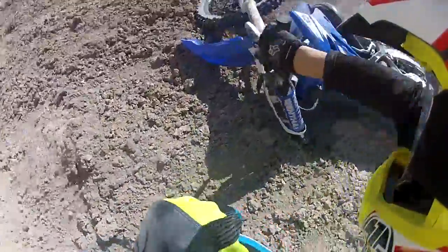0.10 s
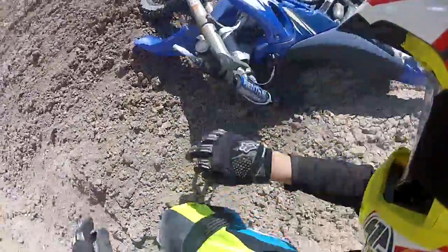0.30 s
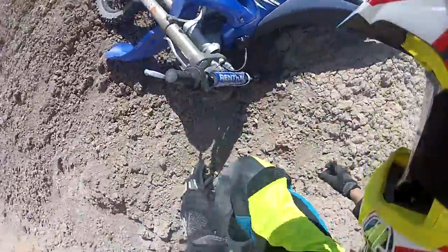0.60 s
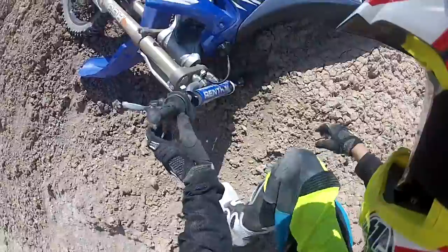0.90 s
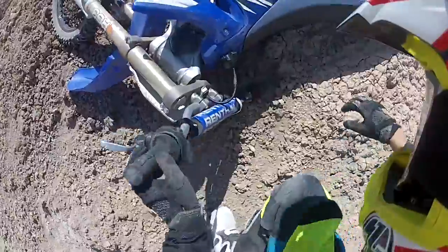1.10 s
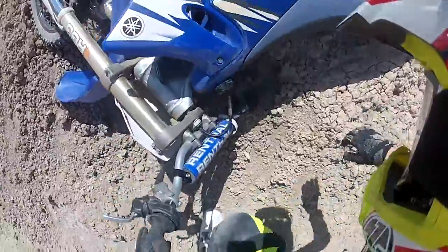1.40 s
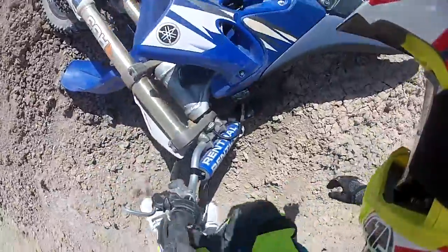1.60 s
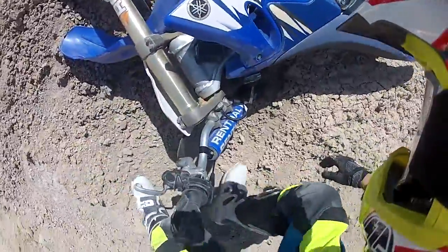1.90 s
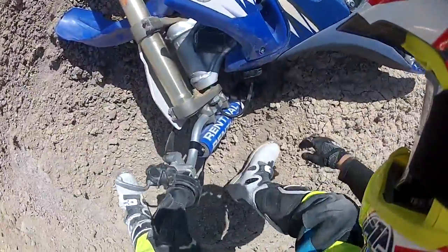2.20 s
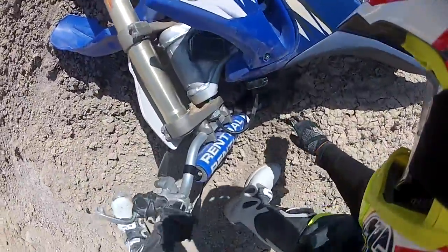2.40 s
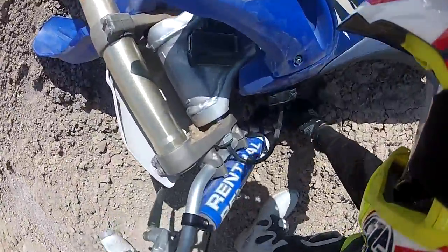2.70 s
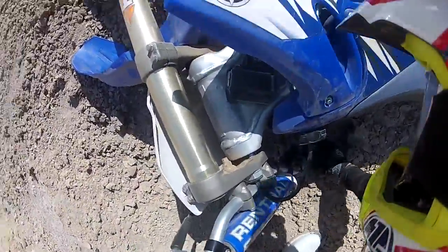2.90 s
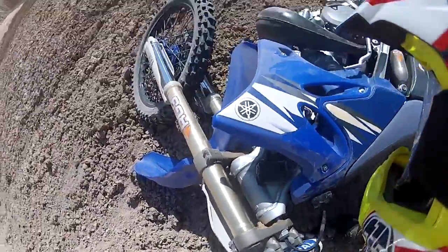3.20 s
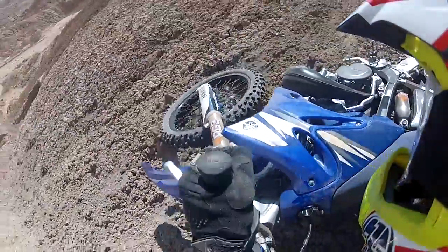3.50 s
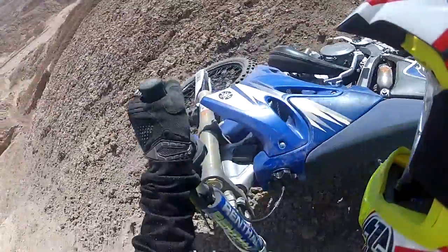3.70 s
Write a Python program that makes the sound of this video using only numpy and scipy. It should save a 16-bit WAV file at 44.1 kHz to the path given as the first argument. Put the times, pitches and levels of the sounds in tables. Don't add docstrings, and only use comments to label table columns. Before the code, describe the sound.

Scuffing boots slide over gritty ground while a muffled microphone rumbles, straps tap and pebbles tick

```python
import sys
import numpy as np
from scipy import signal
from scipy.fft import rfft, irfft, next_fast_len
from scipy.io import wavfile
from scipy.ndimage import uniform_filter1d, map_coordinates

SR = 44100
rng = np.random.default_rng(int(sys.argv[2]) if len(sys.argv) > 2 else 0)


def makeup_ratio(level_db):
    decades = np.asarray(level_db, float) / 20
    return 10 ** decades


def master(y):
    cut = np.clip(np.atleast_2d(y).T, -1, 1)
    pcm = np.round(cut * 32767)
    wavfile.write(sys.argv[1], SR, pcm.astype(np.int16))


N = 167580

PATCH_DB = 2


def unit(x):
    return x / np.sqrt(np.mean(x ** 2) + 1e-20)


def filtered(x, response):
    m = next_fast_len(N + 8192)
    return irfft(rfft(x, m) * response(np.fft.rfftfreq(m, 1 / SR)), m)[:N]


def coloured(x, points):
    f, db = np.transpose(points)
    f = np.r_[f[0] / 2, f, f[-1] * 2]
    db = np.r_[-90, db, -90]
    return unit(filtered(x, lambda hz: makeup_ratio(np.interp(np.log(hz + 1), np.log(f + 1), db))))


def curve(rows):
    s, *cols = np.transpose(rows)
    return [np.interp(np.arange(N) / SR, s, c) for c in cols]


def wobble(rate):
    knots = rng.standard_normal(int(N / SR * 400) + 4)
    return map_coordinates(knots, [np.arange(N) * rate / SR])


def gate(s, length, attack, release):
    t = np.arange(N) / SR - s
    return np.clip(t / attack, 0, 1) * np.exp(-np.maximum(t - length, 0) / release)


def grains(count, spread_db):
    place, sign, strength = rng.random((count, 3)).T
    out = np.zeros(N)
    out[(place * N).astype(int)] = np.sign(sign - 0.5) * makeup_ratio(-spread_db * np.log(strength + 0.003))
    return out


def patchy(depth_db):
    z = signal.stft(rng.standard_normal(N), nperseg=256)[2]
    field = uniform_filter1d(rng.standard_normal(z.shape), size=4, axis=0)
    field = uniform_filter1d(field, size=10, axis=1)
    return signal.istft(z * makeup_ratio(depth_db * unit(field)), nperseg=256)[1][:N]


def add(out, s, x):
    part = out[round(s * SR):][:len(x)]
    part += x[:len(part)]


def rumble():
    # start_s, length_s, first_level_db, last_level_db
    gusts = [(0.501, 0.12, -37.5, -20), (0.668, 0.053, -21.5, -34), (0.746, .13, -19.5, -26),
             (0.879, 0.17, -25.5, -27.5), (1.082, 0.054, -34, -39), (1.349, 0.11, -38, -48),
             (1.416, 0.09, -51, -46.5), (1.511, 0.2, -31, -41.5), (1.726, 0.2, -33.5, -36),
             (1.875, 0.15, -33.5, -33), (2.017, 0.099, -36.5, -32.5), (2.149, 0.054, -30.5, -38),
             (2.222, 0.01, -43, -29.5), (2.339, .18, -31.5, -33.5), (2.544, 0.065, -25.5, -37),
             (2.765, 0.19, -35, -39.5), (2.936, 0.15, -60, -51), (3.082, 0.08, -30.5, -39),
             (3.168, 0.086, -22.5, -36), (3.259, 0.057, -47, -35.5), (3.333, 0.13, -44, -45)]
    # frequency_hz, level_db
    push_colour = [(13, -38), (22, 13), (43, 6.5), (103, 2.5), (208, -8.5), (243, -12.5), (400, -27),
                   (520, -27), (880, -120)]
    lump_db, even, even_s, skew = 1.5, 0.83, 0.035, 0.08
    t = np.arange(N) / SR
    strength = makeup_ratio(-51)
    for s, length, first_db, last_db in gusts:
        level = makeup_ratio(np.interp(t, [s, s + length], [first_db, last_db]))
        strength = strength + level * gate(s, length, attack=0.014, release=0.015)
    push = coloured(makeup_ratio(lump_db * wobble(29.93)) * rng.standard_normal(N), push_colour)
    width = int(even_s * SR)
    swell = np.abs(uniform_filter1d(uniform_filter1d(push ** 2, width), width))
    push = unit(push / (swell + 0.059) ** (even / 2))
    lopsided = push + skew * filtered(push ** 2, lambda hz: hz > 25)
    return strength * unit(lopsided)


def taps():
    # start_s, peak_db, pitch_hz
    knocks = [(0.008, -32, 520), (0.153, -26.5, 385), (0.206, -21.5, 500), (0.273, -26, 510),
              (0.281, -38, 547), (0.307, -35, 600), (0.353, -29, 466), (0.437, -23, 440),
              (0.45, -31.5, 262), (0.476, -26.5, 540), (0.77, -27.5, 298), (0.803, -27, 513),
              (0.848, -32, 355), (0.935, -27.5, 517), (0.981, -48, 560), (1.014, -39, 514),
              (1.03, -32.5, 298), (1.059, -43, 560), (1.093, -31, 480), (1.42, -39, 296),
              (1.44, -35.5, 292), (1.503, -33.5, 440), (1.621, -21, 530), (1.633, -28.5, 550),
              (1.992, -35.5, 556), (2.314, -33, 490), (2.351, -36, 452), (2.38, -32, 470),
              (2.593, -33, 556), (2.932, -34, 600), (2.962, -30, 325), (2.982, -27, 280),
              (2.99, -26.5, 297), (2.999, -30, 453), (3.003, -33, 563), (3.424, -34, 510),
              (3.536, -29, 204), (3.609, -32, 603), (3.654, -33.5, 585), (3.715, -36, 285),
              (3.751, -36.5, 580)]
    # delay_s, level_db
    rattle = [(.007, -16.5), (.012, -23.5), (.02, -43)]
    swell_s, cycles = 0.00327, 0.78
    out, t = np.zeros(N), np.arange(-500, 500) / SR
    for s, db, hz in knocks:
        blip = np.cos(2 * np.pi * hz * t) * np.exp(-(t * hz / cycles) ** 2)
        for delay, echo_db in [(0.00073, 0)] + rattle:
            add(out, s + swell_s + delay + t[0], makeup_ratio(db + echo_db) * blip)
    return out


def squeaks():
    # time_s, pitch_hz, level_db
    whistles = [
        [(3.412, 1850, -58), (3.428, 2350, -57), (3.44, 2750, -60), (3.455, 3300, -56), (3.467, 3900, -70)],
        [(3.585, 2830, -66), (3.606, 2900, -68), (3.611, 2930, -55), (3.622, 3000, -51), (3.648, 3150, -58),
         (3.666, 3260, -63), (3.678, 3350, -55), (3.692, 3460, -53), (3.698, 3510, -68)],
        [(3.7, 3540, -67), (3.72, 3600, -67), (3.735, 3700, -71), (3.75, 3830, -68), (3.76, 3910, -63),
         (3.778, 4050, -74)],
    ]
    waver, flutter_db = 0.008, 2.2
    out, t = np.zeros(N), np.arange(N) / SR
    for rows in whistles:
        hz, db = curve(rows)
        phase = 2 * np.pi * np.cumsum(hz * (1 + waver * wobble(120))) / SR
        sounding = (t > rows[0][0]) * (t < rows[-1][0])
        out += sounding * makeup_ratio(db + 2.5 + flutter_db * wobble(70)) * np.sin(phase)
    return out


def ticks():
    # start_s, peak_db, pitch_hz
    pebbles = [(0.2271, -37, 1350), (0.2322, -30, 3100), (0.239, -44, 3500), (0.395, -51, 1600),
               (0.4772, -39.5, 1630), (0.55, -46, 2440), (0.5702, -44, 2240), (0.581, -44.5, 2640),
               (0.6308, -43.5, 1390), (0.7917, -47, 2500), (0.807, -47, 2310), (0.8431, -51, 2500),
               (0.8708, -44, 2800), (0.8847, -48, 2800), (0.9124, -46, 2020), (1.0194, -50, 1830),
               (1.608, -55, 2100), (1.622, -44, 2250), (1.629, -42, 2950), (1.642, -45, 3050),
               (1.8652, -40, 3740), (1.889, -48.5, 2070), (2.0712, -46.5, 3160), (3.197, -41.5, 1820),
               (3.238, -40.5, 2900), (3.327, -42, 1800), (3.3544, -44, 3030), (3.3784, -44, 2580),
               (3.392, -36.5, 1880), (3.399, -52, 4200), (3.452, -44, 1300), (3.4252, -37.5, 1380),
               (3.478, -47, 2200), (3.505, -40, 3230), (3.5188, -39, 3130), (3.536, -43, 900),
               (3.6358, -32, 1860), (3.656, -40, 1850), (3.6635, -36, 2600), (3.6706, -38.5, 2600),
               (3.694, -47, 1800), (3.704, -46, 2270), (3.789, -43, 1700)]
    # start_s, peak_db, pitch_hz
    fine_pebbles = [(0.2309, -33.5, 5600), (3.1844, -40, 4000), (3.194, -43, 4000), (3.206, -40, 3950),
                    (3.2178, -46, 4830), (3.2388, -42, 4900), (3.2716, -37, 5400), (3.321, -43, 4900),
                    (3.343, -53, 4000), (3.3543, -44, 5440), (3.3803, -42, 5450), (3.392, -43, 5500),
                    (3.6352, -35, 3870), (3.658, -46, 5300), (3.665, -42, 5600), (3.671, -44, 5400)]
    contact = 4
    cracks, rings, t = np.zeros(N), np.zeros(N), np.arange(900) / SR
    for rows, t60, ring in [(pebbles, 0.0085, 1), (fine_pebbles, 0.005, 0.45)]:
        for s, db, hz in rows:
            fade = makeup_ratio(db - 60 * t / t60)
            add(cracks, s, fade * (rng.standard_normal(len(t)) + contact * (t == 0)))
            add(rings, s, ring * fade * np.sin(2 * np.pi * hz * t))
    return rings + filtered(cracks, lambda hz: hz ** 2 / (hz ** 2 + 1300 ** 2))


def rasp():
    # start_s, length_s, level_db
    strokes = [
        (3.338, 0.027, -70),
        (3.4, 0.074, -62),
        (3.475, 0.057, -64),
        (3.546, 0.054, -68.5),
    ]
    centre_hz, width_hz = 3950, 200
    band = filtered(grains(count=2500, spread_db=0), lambda hz: np.exp(-((hz - centre_hz) / width_hz) ** 2))
    return unit(band) * sum(makeup_ratio(db) * gate(s, length, 0.01, 0.012) for s, length, db in strokes)


def scrapes():
    # start_s, length_s, bright_db, dull_db, sharp_edge_db
    slips = [(0.223, 0.02, -44, -41, -48.5), (0.243, 0.019, -80, -41, -83), (0.487, 0.011, -52.5, -42, -80),
             (0.922, 0.028, -53, -38, -89), (1.267, 0.049, -60.5, -81, -62),
             (1.606, 0.02, -53.5, -45.5, -63), (1.619, 0.03, -52.5, -35.5, -64),
             (1.652, 0.036, -65, -50, -66), (1.864, 0.0049, -49, -40, -59), (1.99, 0.03, -64, -56, -61.5),
             (1.789, 0.023, -66, -72, -68), (2.273, 0.13, -58.5, -45, -64.5),
             (2.907, 0.077, -58, -43.5, -61), (2.961, 0.057, -61, -39, -70), (3.01, 0.1, -67, -43.5, -89),
             (3.333, 0.1, -51.5, -59, -60.5), (3.401, 0.072, -59, -43, -67),
             (3.486, 0.075, -59, -52, -62.5), (3.613, 0.046, -53, -46.5, -61), (3.79, .02, -56, -58, -61)]
    # frequency_hz, level_db
    bright_colour = [(700, 5.5), (1200, 8.5), (2200, 4), (3100, 4), (3800, -20), (4500, -55)]
    # frequency_hz, level_db
    case_colour = [(150, -0.5), (280, -2.5), (520, -1.5), (700, -11), (950, -19), (1500, -35)]
    # frequency_hz, level_db
    sharp_colour = [(3200, 5), (3900, -2), (5000, 0.5), (5900, 8.5)]
    # centre_hz, width_hz, boost_db
    hollows = [(1330, 150, 6), (2250, 590, 8), (3050, 360, 4.5)]
    sag_db = 2
    t, shapes = np.arange(N) / SR, np.zeros((3, N))
    for s, length, *layers_db in slips:
        sag = makeup_ratio(-sag_db * np.clip((t - s) / length, 0, 1))
        slow = 5 * length ** 2
        opening = gate(s, length, attack=0.00074 + slow, release=0.0015 + slow)
        shapes += makeup_ratio(layers_db)[:, None] * sag * opening
    gritty = unit(patchy(PATCH_DB)) + 1.34 * unit(grains(count=4000, spread_db=2.5))
    hollow = filtered(gritty, lambda hz: makeup_ratio(sum(db * np.exp(-((hz - c) / w) ** 2) for c, w, db in hollows)))
    bright = coloured(hollow, bright_colour)
    dull = coloured(rng.standard_normal(N), case_colour)
    sharp = coloured(gritty, sharp_colour)
    return makeup_ratio(1.4 * wobble(150)) * (shapes * [bright, dull, sharp]).sum(axis=0)


def scuff():
    # time_s, sliding_pressure_db, weight_carried_db
    steps = [(0.0, -59.5, -47.5), (.12, -59, -50), (.41, -57.5, -45), (.7, -60, -50), (1.0, -62, -50),
             (1.17, -58.5, -49.5), (1.38, -60.5, -54), (1.7, -63.5, -57.5), (1.95, -63, -48.5),
             (2.2, -65, -60.5), (2.5, -60, -47), (2.75, -58, -47.5), (2.88, -62, -49), (3.1, -58, -48),
             (3.55, -59, -46.5), (3.8, -57.5, -47)]
    # frequency_hz, level_db
    grit_colour = [(900, -5), (1100, -5), (1600, -8.5), (2300, -5.5), (3100, -8), (3600, -13),
                   (4300, -14.5), (5900, -15.5)]
    # frequency_hz, level_db
    ground_colour = [(35, -38), (60, 3.5), (120, -15), (139, 3.5), (184, -5), (226, 1.5), (644, -1.5),
                     (1100, -31), (1430, -79), (2420, -120)]
    pressure_db, weight_db = curve(steps)
    crunch = coloured(grains(count=900, spread_db=-3.5), grit_colour)
    grit = coloured(patchy(PATCH_DB), grit_colour) + makeup_ratio(-6.5) * crunch
    thuds = coloured(grains(count=500, spread_db=4.5), ground_colour)
    dull = coloured(rng.standard_normal(N), ground_colour) + 0.57 * thuds
    sway_db = 0.33 * wobble(20) + 0.57 * wobble(45)
    sliding = makeup_ratio(pressure_db) * unit(grit)
    thudding = makeup_ratio(weight_db + 1.5 + 1.6 * wobble(27)) * unit(dull)
    return makeup_ratio(sway_db) * (sliding + thudding)


def scene():
    return (rumble() + taps() + squeaks() + ticks() + rasp() + scrapes() + scuff())[None]


def roll_off(x):
    return signal.sosfilt(signal.butter(12, 16500, fs=SR, output="sos"), x)


def record(dry):
    hold_hz, bass_hz, edge_hz, top_hz = 12010, 26, 5520, 15300

    def microphone(hz):
        bass_cut = hz ** 2 / (hz ** 2 + bass_hz ** 2)
        return (hz < hold_hz / 2) * bass_cut / (1 + (hz / edge_hz) ** (2 * 10.5))

    base = filtered(dry[0], microphone)
    mirror = 2 * makeup_ratio(0.5) * base * np.cos(2 * np.pi * hold_hz * np.arange(N) / SR)
    held = filtered(base + mirror, lambda hz: np.sinc(hz / hold_hz) / (1 + (hz / top_hz) ** 160))
    return roll_off(held[None])


dry = scene()
out = record(dry)
master(out)
```